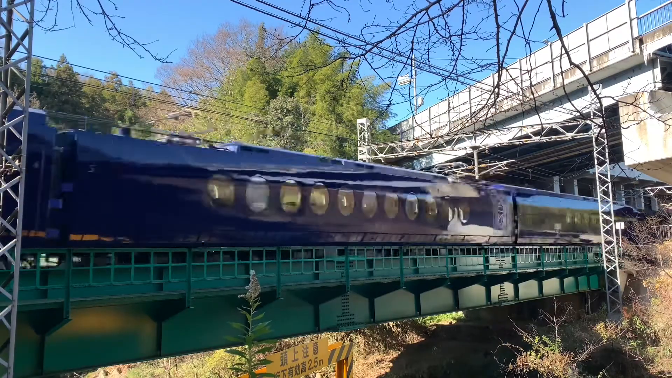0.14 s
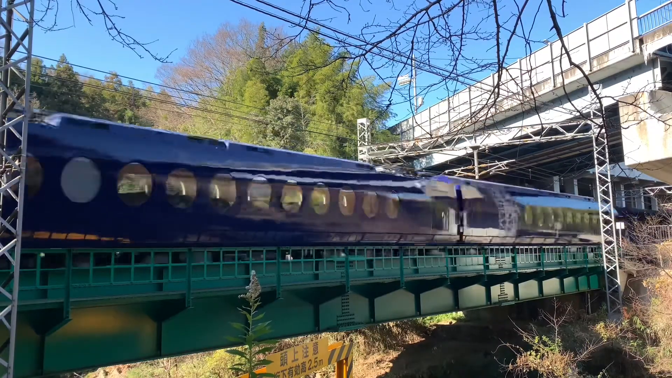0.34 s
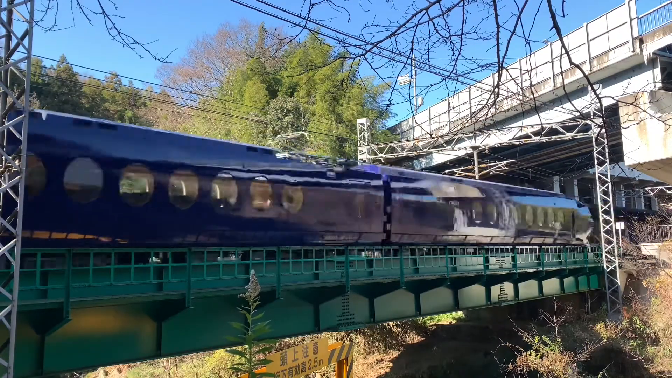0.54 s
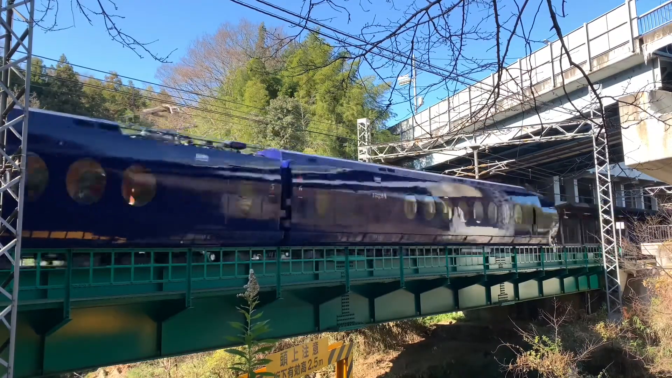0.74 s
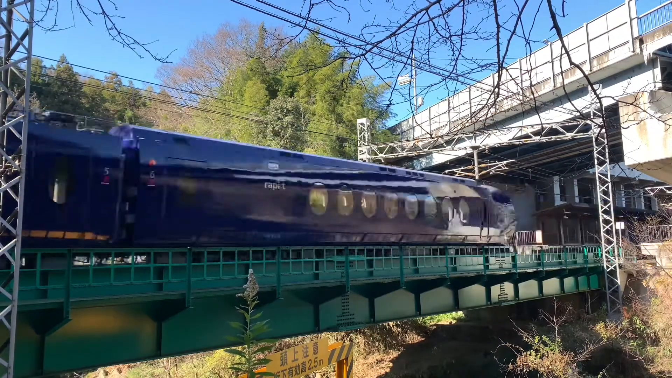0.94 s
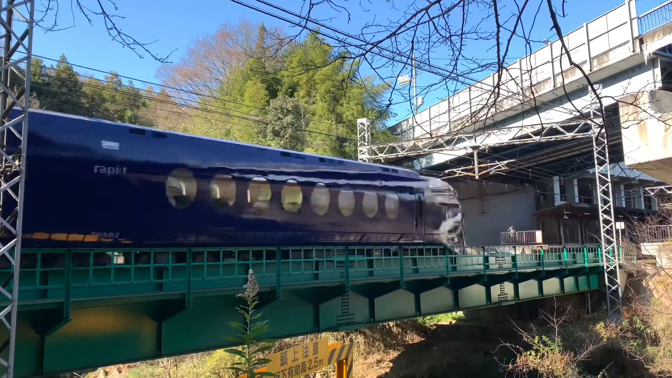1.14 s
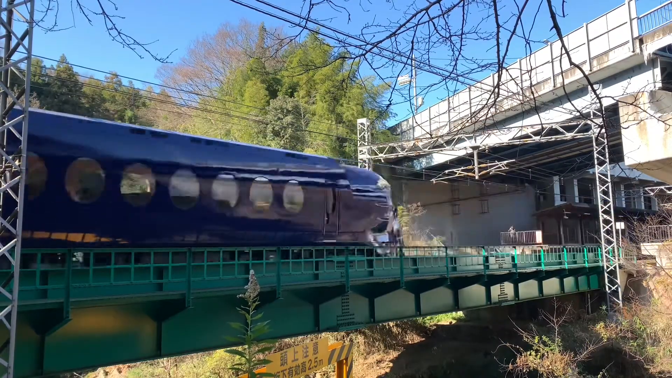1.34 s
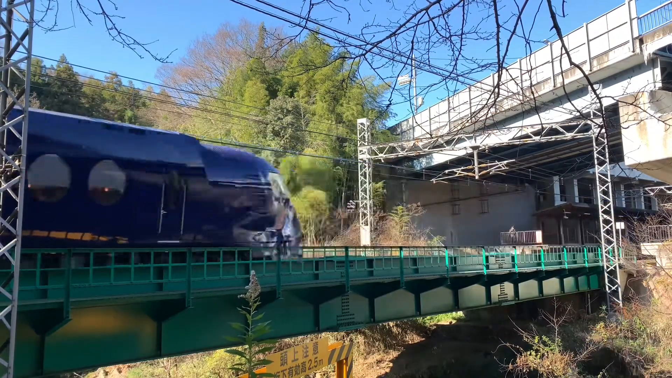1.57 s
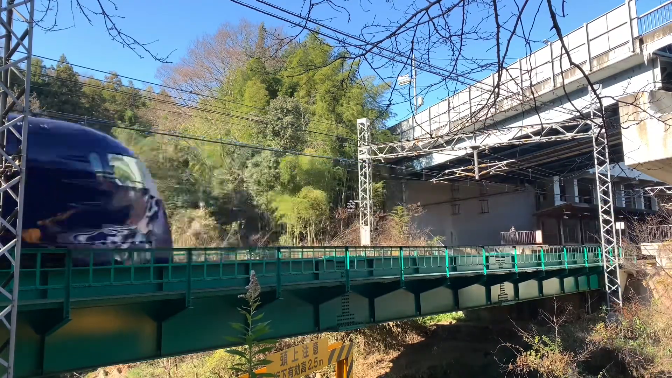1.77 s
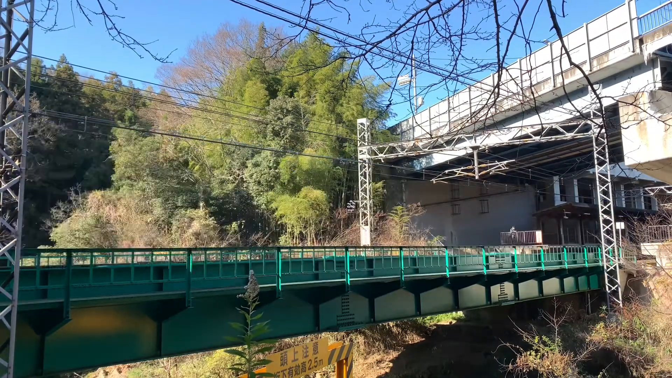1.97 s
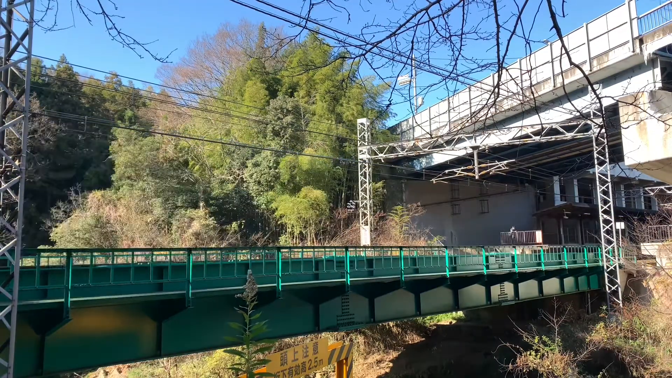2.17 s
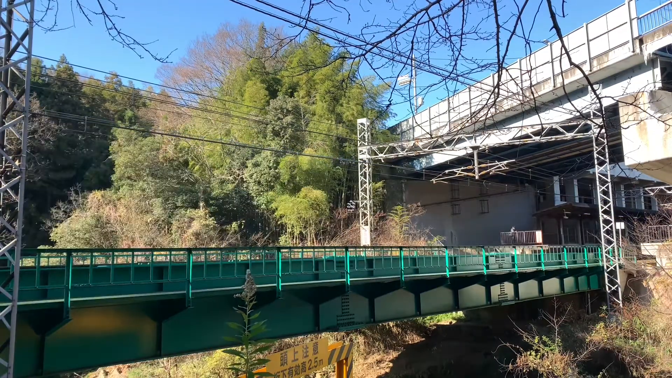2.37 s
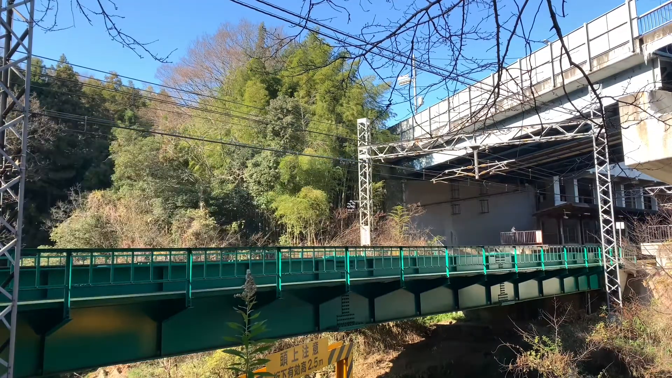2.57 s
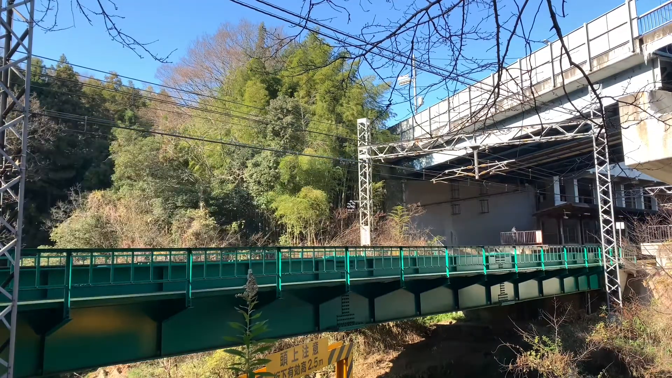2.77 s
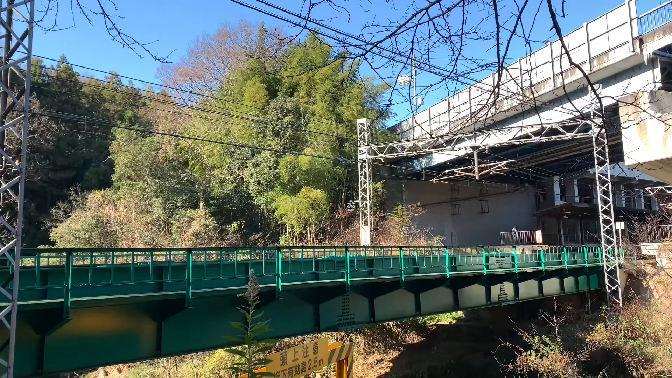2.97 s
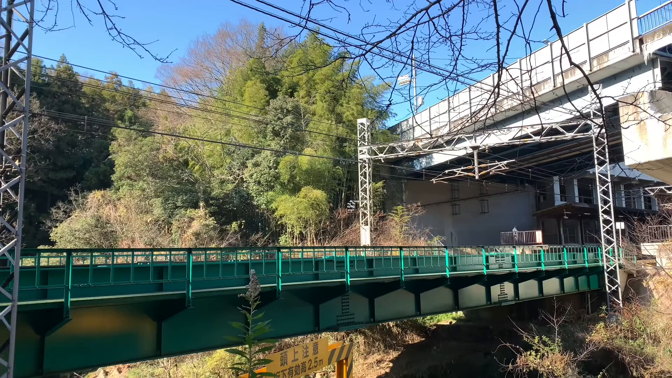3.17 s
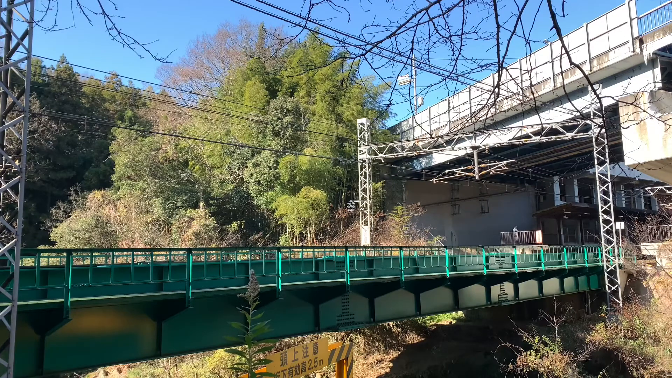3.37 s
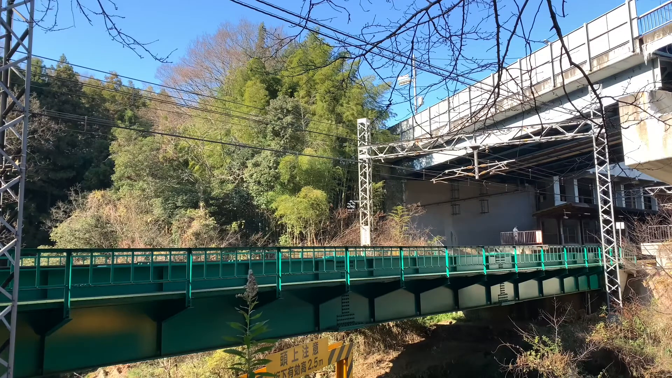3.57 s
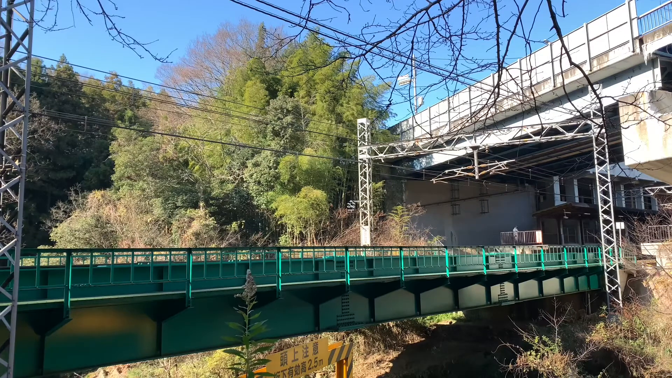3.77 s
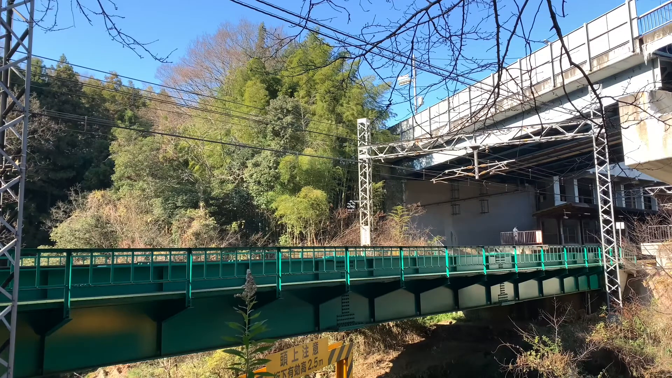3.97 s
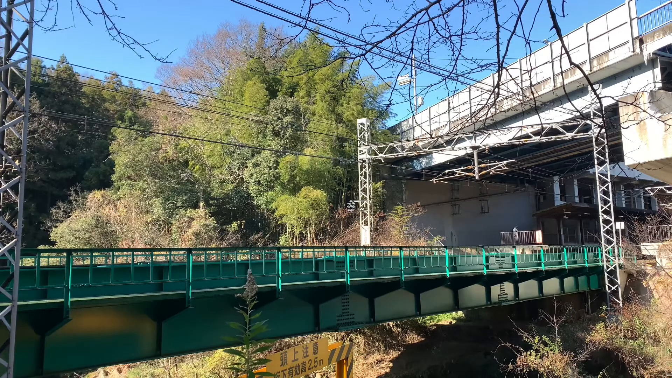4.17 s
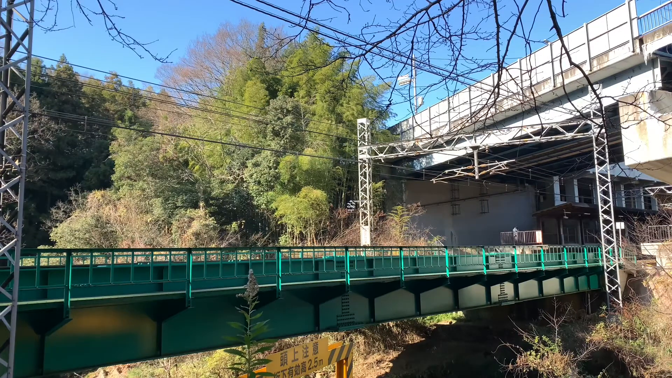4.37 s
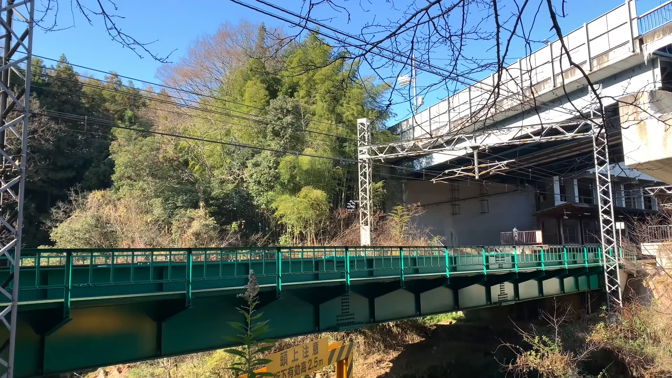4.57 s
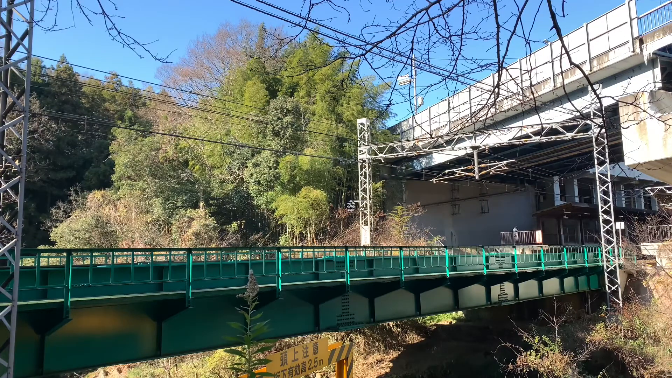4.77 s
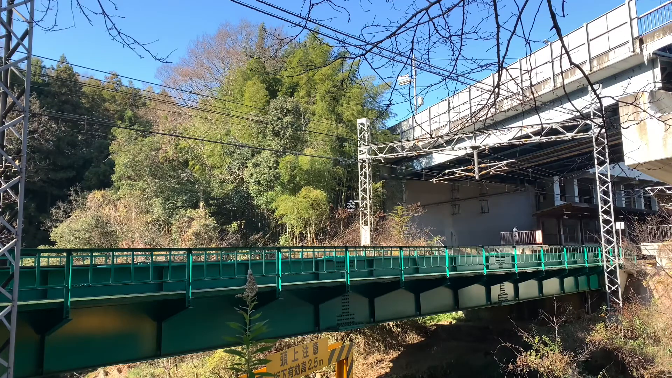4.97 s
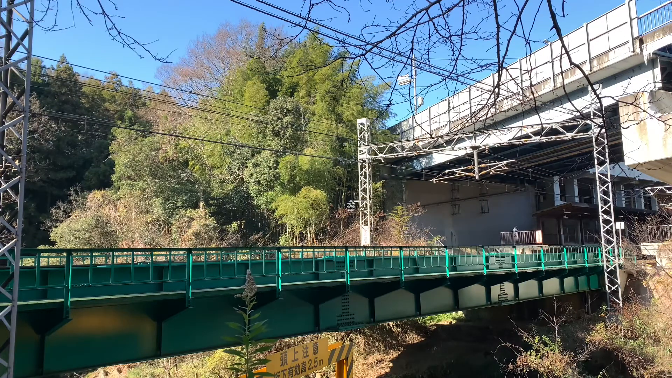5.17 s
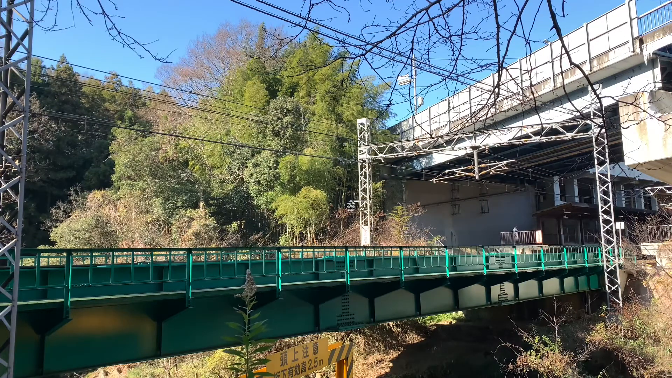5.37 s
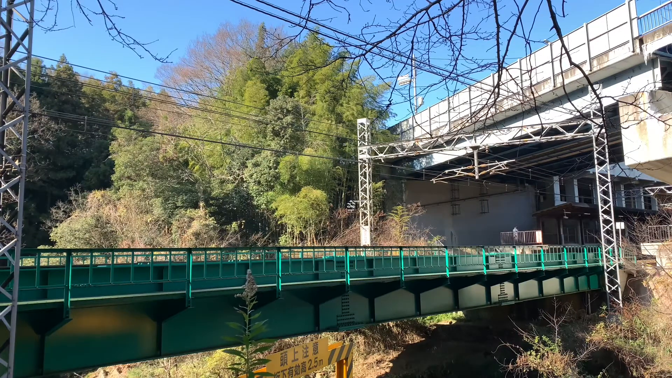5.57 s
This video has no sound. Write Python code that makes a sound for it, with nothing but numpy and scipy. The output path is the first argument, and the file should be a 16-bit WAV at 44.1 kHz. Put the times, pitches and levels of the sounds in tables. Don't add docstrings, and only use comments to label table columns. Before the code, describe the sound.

Outdoors beside a steel girder bridge in a wooded valley, an electric train is already passing close. Low booming, wheel roar, hiss and metallic singing surround paired rail-joint knocks with heavy thuds. The last car leaves before two seconds; softer, duller clatter follows, a small cluster near two and a half, then the rumble fades to faint distant road wash. Fixed stereo microphone, wide when near.

```python
import sys
import numpy as np
from scipy import signal
from scipy.fft import rfft, irfft, next_fast_len
from scipy.io import wavfile
from scipy.ndimage import uniform_filter1d

SR = 44100
rng = np.random.default_rng(int(sys.argv[2]) if len(sys.argv) > 2 else 0)


def waveform_to_disk(signal):
    frames = np.transpose(np.atleast_2d(signal))
    scaled = np.clip(frames, -1, 1) * 32767
    samples = np.round(scaled).astype(np.int16)
    wavfile.write(sys.argv[1], SR, samples)


def undo_db(level):
    steps = np.asarray(level, float) / 20
    return 10 ** steps


N = 248280

# start_s [s], level_db [dB]
WHEELS = [(0, -20), (0.15, -17), (0.4, -22), (0.5, -19.5), (0.85, -23), (1.0, -19), (1.3, -28), (1.57, -26),
          (1.74, -29.5), (2.0, -27), (2.36, -34), (2.5, -28.5), (2.68, -34.5), (3.45, -35.5), (4.4, -39),
          (4.78, -47), (4.94, -39), (5.35, -54)]
NEAR_DB = -22
GONE_S, GONE_OVER_S = 1.57, 0.42


def girders():
    # pitch_hz [Hz], width_hz [Hz], level_db [dB]
    modes = [(52.3, 8.4, -5), (64.6, 22.6, -3), (81.3, 8.1, -6.5), (98, 8.7, -6), (106.5, 18.5, -9.5),
             (131, 7.7, -7), (159.4, 23, -12.5), (203.5, 43, -10)]
    # start_s [s], boom_db [dB]
    load = [(0, -11), (0.17, -13.5), (0.42, -16.5), (0.85, -14), (1.18, -15), (1.3, -18), (1.57, -15),
            (1.77, -20.5), (1.93, -21), (2.03, -27), (2.41, -25), (2.68, -35.5), (3.45, -32.5), (3.68, -42),
            (3.95, -32), (4.22, -42), (5.05, -38), (5.25, -45)]
    # middle_s [s], level_db [dB], half_length_s [s]
    swells = [(0.02, -19.5, 0.049), (0.184, -24, 0.052), (0.492, -20.5, 0.059), (0.7, -17.5, 0.097),
              (1.104, -18, 0.14), (1.565, -18, 0.076), (1.93, -26, 0.04), (2.197, -26.5, .1),
              (2.53, -24.5, 0.14), (2.828, -26, 0.08), (3.286, -34.5, 0.11), (3.68, -35.5, .06),
              (3.847, -36, 0.051), (4.235, -35, 0.041), (4.473, -39.5, 0.059), (4.944, -35, 0.065),
              (5.248, -46.5, 0.17)]
    force, t = rng.standard_normal((2, N)), np.arange(N) / SR
    boom = 0
    for k, (hz, width, db) in enumerate(modes):
        mode = ring(ring(force, hz, width), hz, 3 * width)
        boom = boom + (-1) ** k * undo_db(db) * evened(mode)
    boom /= uniform_filter1d(boom[0] ** 2, 3000) ** .25

    load_db = control(load)
    swell = undo_db(load_db - 19)
    for s, db, half_length in swells:
        swell = swell + undo_db(db) * np.exp(-((t - s) / half_length) ** 2)
    hum = swell * wandering(hz=89, width=2.5, count=N)
    return undo_db(load_db) * evened(boom) + hum


def roar():
    roar_colour = [(60, 0.5), (150, -1.5), (300, 1), (480, -2.5), (700, -5.5), (950, -13.5), (1400, -13.5),
                   (2200, -15), (3200, -20.5), (6000, -43)]
    return undo_db(control(WHEELS)) * noise(roar_colour, size=512, patchy_db=1.5, flicker_db=0.4)


def hiss():
    hiss_colour = [(1500, 0.5), (3000, -1.5), (4200, 0), (5500, -6), (7500, -7.5), (8300, -4.5),
                   (10000, -10), (15500, -13), (17000, -30)]
    return hiss_level() * noise(hiss_colour, size=512, patchy_db=0.56, flicker_db=1.5)


def hiss_level():
    # middle_s [s], extra_db [dB], half_length_s [s]
    underframes = [
        (0.3, -2, 0.4),
        (1.055, 0, 0.18),
        (1.365, 2, 0.17),
        (2.47, 5.5, 0.11),
        (3.094, -2, 0.63),
    ]
    t = np.arange(N) / SR
    cars_db = sum(db * np.exp(-((t - s) / half_length) ** 2) for s, db, half_length in underframes)
    wheels_db = 0.73 * (control(WHEELS) - NEAR_DB)
    air_db = -14.5 * np.maximum(t - GONE_S, 0)
    train = undo_db(-30.5 + wheels_db + air_db)
    return undo_db(cars_db) * (train + undo_db(-57))


def singing():
    tones = [
        (467.5, 38, -2.5, -34, 0.57),
        (932, 92, 2, -32, 1.38),
        (1830, 98, -1, -39, 1.8),
        (8280, 170, -8, -55, 1.5),
    ]
    closeness_db = control(WHEELS) - NEAR_DB
    out = 0
    for hz, width, pan_db, db, share in tones:
        side = undo_db(np.array([[pan_db], [-pan_db]]) / 2)
        tone = evened(ring(rng.standard_normal((2, N)), hz, width))
        out = out + side * undo_db(db + share * closeness_db) * tone
    return out


def joints():
    # start_s [s], blow_db [dB], brightness [dB per octave]
    wheel_blows = [(0.009, -4, -1), (0.048, -8, -1.5), (0.1, -3.5, 3.5), (0.168, -23, -7), (0.293, -16, 3),
                   (0.582, -1.5, 0.7), (0.671, -0.5, 2), (0.72, -12.5, 3), (0.871, -1.5, 2),
                   (0.958, -2.5, 2), (1.071, -18.5, 6.5), (1.445, -1, 1.3), (1.535, -3, 0.5),
                   (1.595, -19, 3), (1.642, -16, -2), (1.74, -18.5, 3), (1.847, -18, -2), (1.943, -18, 2),
                   (2.021, -20, 3.3), (2.225, -28, 2.2), (2.321, -29, 4.5), (2.426, -20, 2),
                   (2.521, -18.5, 2.4), (2.6, -18, 0), (3.764, -37, -7.5), (4.84, -30, -1.5)]
    # pitch_hz [Hz], level_db [dB]
    near_colour = [(150, -27.5), (350, 7), (600, 3), (1000, 0.5), (1800, -9), (2600, -15.5), (4000, -26),
                   (9000, -29.5), (16000, -49)]
    # pitch_hz [Hz], level_db [dB]
    far_colour = [(150, 0), (350, 11), (600, 3), (1100, 1), (1500, 1.5), (2200, 0.5), (3000, -7.5),
                  (4300, -13), (6000, -29), (9000, -25), (12500, -24), (16000, -36)]
    # pitch_hz [Hz], fade_s [s]
    fade_times = [(200, 0.25), (600, 0.89), (1500, 0.16), (4000, 1), (12000, 0.56)]
    hz = np.fft.rfftfreq(256, 1 / SR)
    t = np.arange(N // 64 + 5)[:, None] * 64 / SR
    power = 1e-20
    for s, db, bright_db in wheel_blows:
        age = np.maximum(t - s + 0.0047, 0)
        far = np.clip((s - 1.55) / 0.24, 0, 1)
        rattle_s = 0.041 + far * (0.039 - 0.041)
        tail_db = -6 + far * (-7.5 + 6)
        colour_db = (1 - far) * read(near_colour, hz) + far * read(far_colour, hz)
        colour_db = colour_db + bright_db * np.log2(hz / 1000 + 0.11)
        rattle = np.exp(-(age / rattle_s) ** 2)
        tail = undo_db(tail_db - 60 * age / read(fade_times, hz))
        onset = np.minimum(age / (0.0076 + 0.0042 * far), 1)
        power = power + (undo_db(db - 17.5 + colour_db) * (rattle + tail) * onset) ** 2
    z = np.exp(2j * np.pi * rng.random((2, len(t), len(hz)))) * np.sqrt(2 * power)
    return signal.istft(z.transpose(0, 2, 1), nperseg=256, noverlap=192)[1][:, :N] / 2


def thuds():
    girder_thuds = [(0.019, -4.5, 131), (0.11, -11, 128), (0.587, -3, 131), (0.679, -4.5, 183),
                    (0.739, -16, 146), (0.88, -5, 134.6), (0.967, -3.5, 128), (1.169, -9.5, 173),
                    (1.455, -3.5, 134.6), (1.537, -10.5, 133), (1.609, -41.5, 127), (1.667, -16, 152),
                    (1.939, -11, 181.6), (2.426, -15.5, 200), (2.516, -15.5, 189.4), (2.61, -17, 133),
                    (3.955, -18.5, 196), (4.005, -18.5, 206), (4.44, -26, 161), (4.969, -20.5, 154)]
    return undo_db(-6.5) * knocks(girder_thuds, width=0.085, rise=0.014, t60=0.2)


def plates():
    plate_rings = [(.11, -25, 695), (.585, -10.5, 357), (.675, -16, 482), (.69, -38, 830),
                   (.88, -10.5, 503), (.97, -17.5, 474), (1.45, -11.5, 435), (1.455, -24, 1010),
                   (1.54, -11.5, 446), (1.545, -20, 871), (1.755, -35, 2980), (1.845, -22, 623),
                   (1.86, -40, 1100), (1.865, -30, 1954), (2.03, -25, 987), (2.31, -33, 776),
                   (2.415, -15, 589), (2.435, -27, 2000), (1.945, -19.5, 198), (2.52, -18, 206),
                   (2.52, -47, 328), (2.53, -18, 250), (4.93, -45, 423), (2.535, -33, 3900),
                   (2.593, -36, 1150), (2.61, -29, 446), (3.84, -25, 454), (3.9, -28.5, 413)]
    return knocks(plate_rings, width=0.22, rise=0.0051, t60=0.16)


def snaps():
    steel_snaps = [
        (1.73, -23.5, 14200, 3000),
        (1.9245, -38, 11000, 2500),
        (2.0133, -36, 11800, 3000),
        (2.2493, -46, 12000, 4000),
        (2.2737, -44, 8800, 1500),
        (2.5002, -45, 13000, 3500),
        (2.592, -38.5, 10800, 3500),
        (3.8013, -58, 9300, 3000),
    ]
    out, u = np.zeros((2, N)), np.arange(4000) / SR
    for s, db, hz, width in steel_snaps:
        tick = undo_db(db - 60 * u / .014)
        sizzle = undo_db(db - 22 - 60 * u / .15)
        shake = rng.standard_normal((2, len(u)))
        steel = evened(ring(ring(shake, hz, width), hz, width))
        out[:, round(s * SR):][:, :len(u)] += (tick + sizzle) * steel
    return out


def road_wash():
    wash_colour = [(60, 5.5), (300, -4.5), (500, 0.5), (900, -1), (1400, -10.5), (2000, -13.5),
                   (3000, -15.5), (4500, -23), (7000, -36), (10000, -42), (12500, -63), (15500, -76)]
    return undo_db(-40.5) * noise(wash_colour, size=1024, patchy_db=2.0, flicker_db=4.5)


def gone(t):
    return np.clip((t - GONE_S) / GONE_OVER_S, 0, 1)


def evened(x):
    return x / np.sqrt(np.mean(x ** 2) + 1e-20)


def read(rows, hz, column=1):
    rows = np.array(rows)
    return np.interp(np.log(hz + 1), np.log(rows[:, 0] + 1), rows[:, column])


def control(rows):
    s, db = np.transpose(rows)
    return np.interp(np.arange(N) / SR, s, db)


def ring(x, hz, width):
    pole = np.exp((2j * np.pi * hz - np.pi * width) / SR)
    return 2 * signal.lfilter([1 - abs(pole)], [1, -pole], x).real


def wandering(hz, width, count):
    drift = np.cumsum(rng.standard_normal((2, count)), axis=1) * np.sqrt(2 * np.pi * width / SR)
    drift = uniform_filter1d(drift, int(SR / hz * 2) + 1, axis=1)
    start = 2 * np.pi * rng.random((2, 1))
    return np.sqrt(2) * np.sin(2 * np.pi * hz * np.arange(count) / SR + drift + start)


def knocks(rows, width, rise, t60):
    out, u = np.zeros((2, N + SR)), np.arange(SR // 4) / SR
    for s, db, hz in rows:
        shape = undo_db(db - 60 * u / t60) * np.minimum(u / rise, 1)
        out[:, round(s * SR):][:, :len(u)] += shape * wandering(hz, width * hz, count=len(u))
    return out[:, :N]


def noise(colour, size, patchy_db, flicker_db):
    frames, hz = 4 * N // size + 5, np.fft.rfftfreq(size, 1 / SR)
    z = rng.standard_normal((2, frames, len(hz), 2)) @ [1, 1j]
    patches = uniform_filter1d(rng.standard_normal((frames, len(hz))), 14, 0)
    patches = uniform_filter1d(patches, 8, 1)
    flicker = uniform_filter1d(rng.standard_normal((frames, 1)), 8, 0)
    close = 1 - .65 * gone(np.arange(frames)[:, None] * size / 4 / SR)
    texture_db = close * (patchy_db * evened(patches) + flicker_db * evened(flicker))
    z *= undo_db(read(colour, hz) + texture_db)
    return evened(signal.istft(z.transpose(0, 2, 1), nperseg=size, noverlap=size - size // 4)[1][:, :N])


def ports(pair, table, colour):
    size = next_fast_len(N + 4096, True)
    hz = np.fft.rfftfreq(size, 1 / SR)
    a, b = rfft(pair, size) * undo_db(read(colour, hz))
    same = np.clip(read(table, hz), 0, 1)
    late = read(table, hz, column=2) - 2 * np.pi * hz * 21 / SR
    early = 2 * np.pi * (hz - 10250) * 14 / SR
    phase = np.where(hz < 7600, late, early)
    right = (same * a + np.sqrt(1 - same ** 2) * b) * np.exp(1j * phase)
    tilt = undo_db(read(table, hz, column=3) / 2)
    return irfft(np.array([a * tilt, right / tilt]), size)[:, :N]


def scene():
    # pitch_hz [Hz], likeness [0 to 1], extra_phase [rad], left_right_db [dB]
    near_ports = [(60, .995, .2, -3.3), (170, .95, .45, -2.3), (345, .8, .8, -.8), (520, .56, 1.0, .8),
                  (690, .36, .9, 2.1), (860, .46, .3, 2.8), (1050, .47, .5, 2.8), (1380, .3, .4, 1),
                  (2070, .55, .3, .7), (2450, .42, .5, 1), (3100, .56, .4, 1.3), (4800, .15, 0, .2),
                  (7300, .2, 0, -1.5), (8500, .6, 0, -2)]
    far_ports = [(61, 1, -0.02, -3), (250, 0.87, -0.063, -2), (396, 0.65, -0.31, 1.5),
                 (1100, 0.77, -0.36, 1.1), (1470, 0.85, 0.56, -0.5), (2000, 0.67, -0.4, 0.5),
                 (3200, 0.55, 0.18, 0.5), (4100, 0.93, -0.37, 1.5), (5300, 0.53, -0.31, -1),
                 (7000, 0.35, -0.88, -2.5), (8500, 0.42, 0, -2.5), (11700, 1, 0, -1)]
    joint_ports = [(100, .99, .3, -2.5), (345, .94, .7, -.8), (520, .9, 1.0, .7), (690, .82, 1.5, 1.9),
                   (1030, .75, 2.2, 3.8), (1200, .65, 2.6, 4.5), (1400, .6, 3.5, 3.5), (1720, .6, 4.2, 2.8),
                   (2070, .6, 5.1, 1.4), (2400, .6, 5.5, .2), (3100, .8, 6.9, .7), (3800, .5, 8.5, .5),
                   (4800, .6, 11, -1.5), (7500, .4, 17, -1.5), (8500, .6, 0, -2)]
    # pitch_hz [Hz], level_db [dB]
    microphone = [(20, -26), (32, -9), (42, 1.5), (55, -1), (2000, 0.5)]
    # pitch_hz [Hz], level_db [dB]
    air = [(44, 4), (75, 0.5), (110, -2), (170, -0.5), (300, 0), (3000, -2.5), (6000, 1), (10000, -6.5),
           (13000, -8.5), (16000, -12)]
    running = girders() + roar() + hiss() + singing() + thuds()
    blows = joints() + plates()
    turn = gone(np.arange(N) / SR) * np.pi / 2
    near = ports(running * np.cos(turn) + snaps(), near_ports, microphone)
    near_blows = ports(blows * np.cos(turn), joint_ports, microphone)
    far = ports((running + blows) * np.sin(turn), far_ports, microphone[:2] + air)
    return near + near_blows + far + ports(road_wash(), far_ports, microphone)


def roll_off(x):
    return signal.sosfilt(signal.butter(12, 15800, fs=SR, output="sos"), x)


def record(dry):
    ceiling = .98
    limited = ceiling * np.tanh(0.98 * dry / ceiling)
    return roll_off(limited)


dry = scene()
out = record(dry)
waveform_to_disk(out)
```